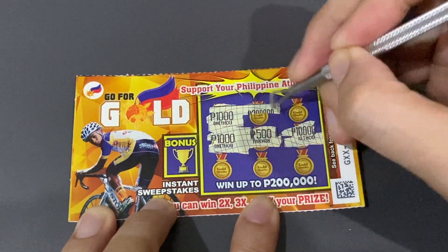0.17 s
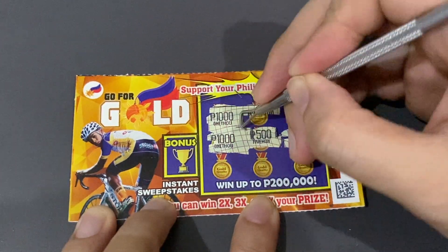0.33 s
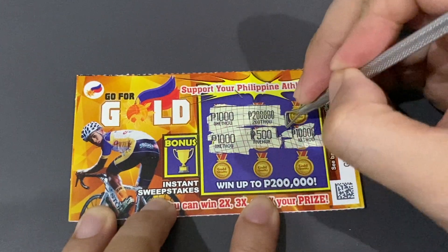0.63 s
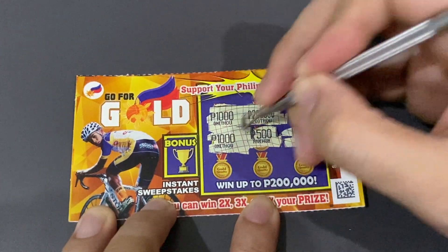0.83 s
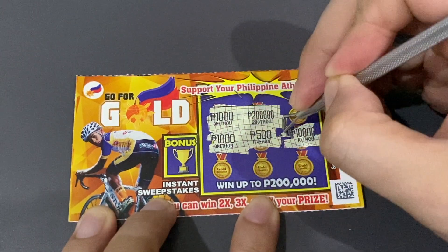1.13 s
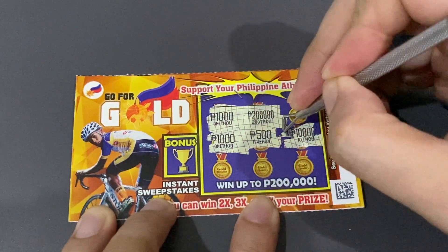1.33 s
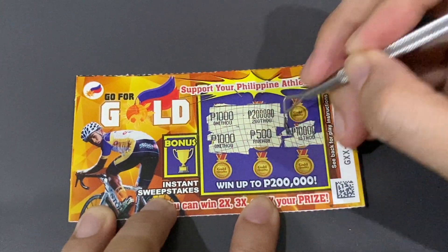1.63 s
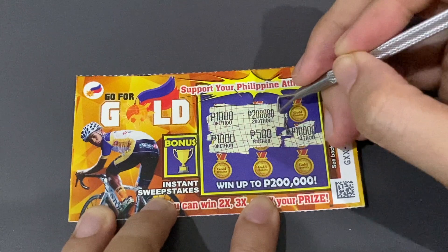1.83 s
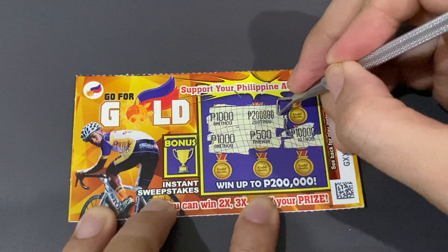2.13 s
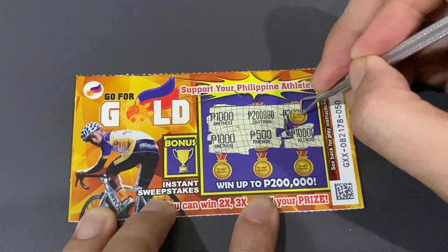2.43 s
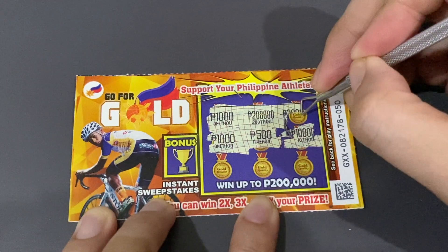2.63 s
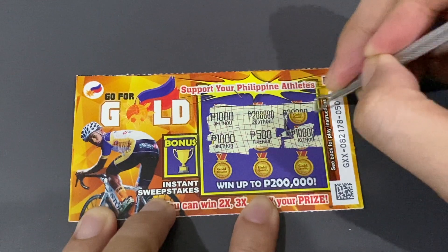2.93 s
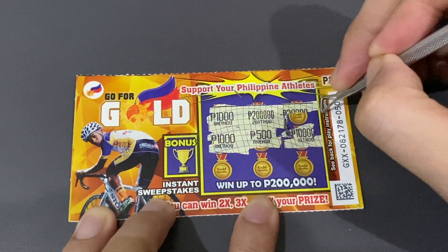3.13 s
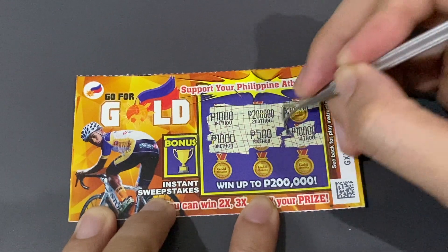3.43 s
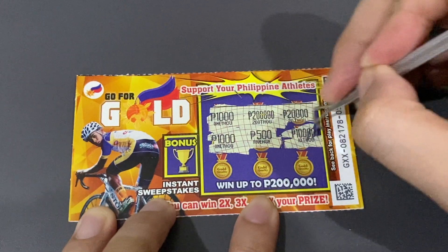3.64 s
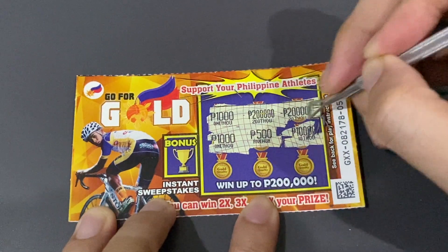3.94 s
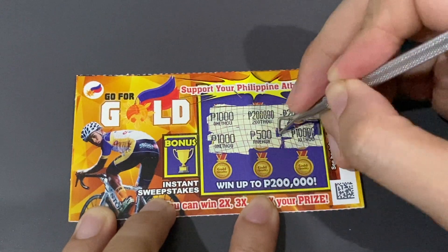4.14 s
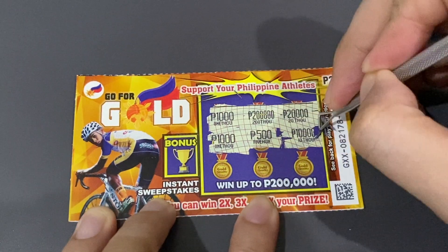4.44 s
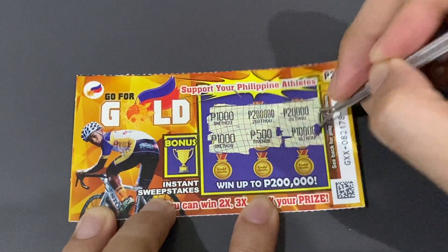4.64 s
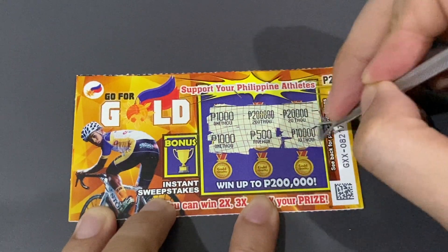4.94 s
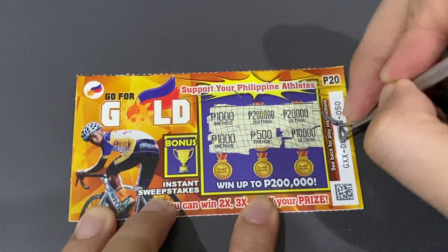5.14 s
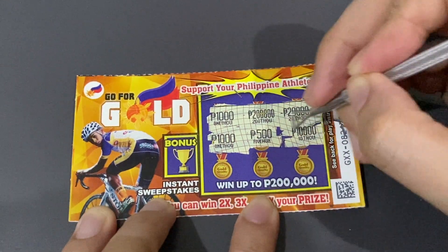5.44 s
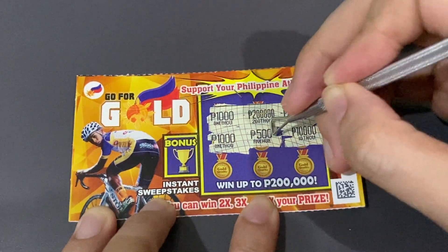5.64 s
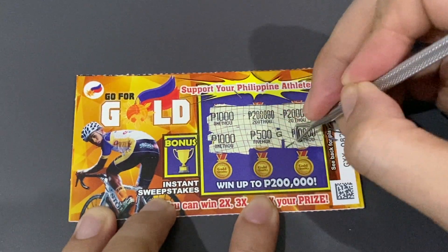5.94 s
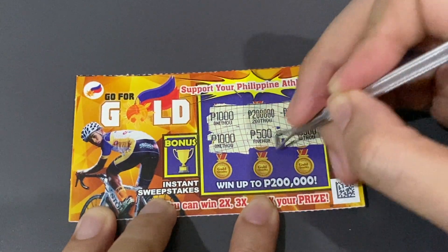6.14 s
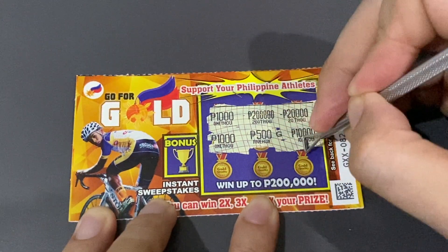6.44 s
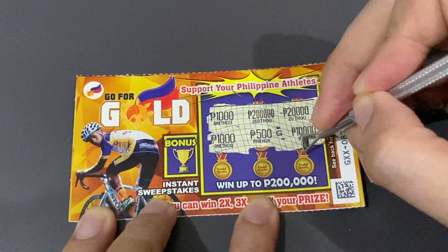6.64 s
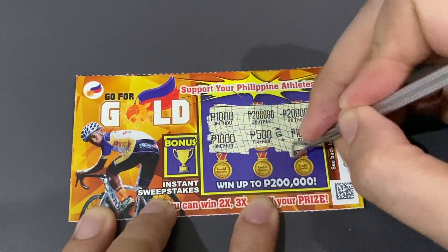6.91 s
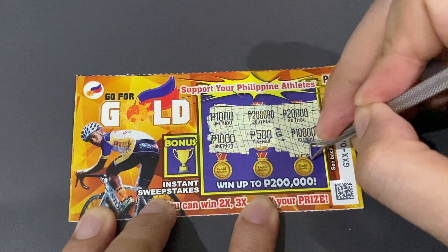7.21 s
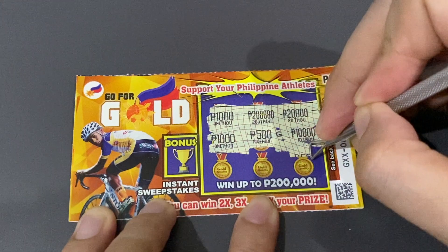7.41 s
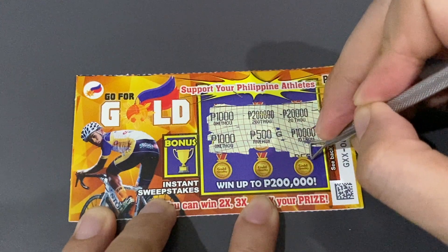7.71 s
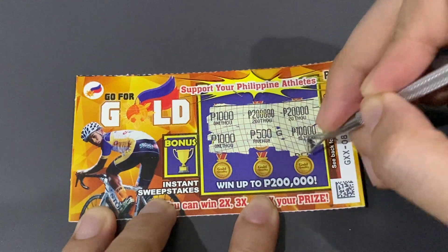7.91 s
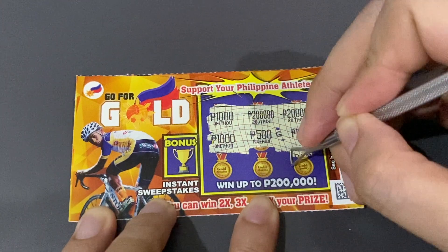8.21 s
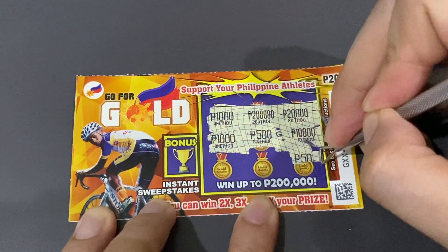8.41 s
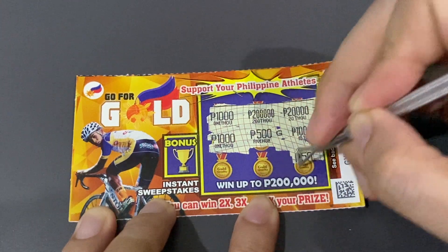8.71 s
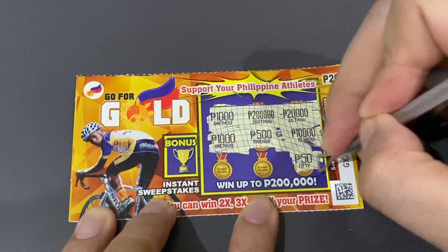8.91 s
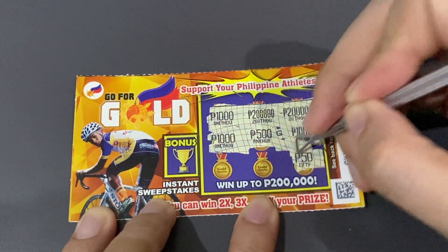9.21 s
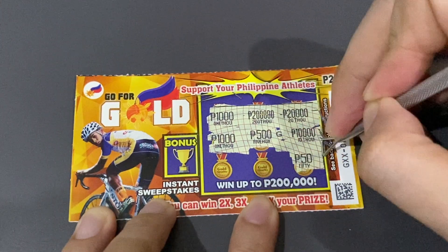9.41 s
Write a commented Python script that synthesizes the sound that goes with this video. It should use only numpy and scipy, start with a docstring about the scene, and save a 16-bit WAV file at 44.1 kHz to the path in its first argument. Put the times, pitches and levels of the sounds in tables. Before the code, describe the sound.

Short, raspy scrapes of a steel tip on a scratch card, mixed with sharp clicks and knocks on a table, in a softly humming room.

```python
"""A low hum fills a small room, and a steel tool starts to scratch the coating off a paper ticket.
Again and again its tip ticks on the card, knocks the table underneath and is dragged in a short rasp.
The knocks make the table top ring. The drags break off tiny crumbs, which hiss and shake the table.
Light touches rustle in between. It is all heard through the two microphone ports of a phone close by."""
import sys
import numpy as np
from scipy import signal
from scipy.fft import rfft, irfft, next_fast_len
from scipy.io import wavfile
from scipy.ndimage import uniform_filter1d, map_coordinates

SR = 44100
rng = np.random.default_rng(int(sys.argv[2]) if len(sys.argv) > 2 else 0)


def wav_record(signal):
    """Record a signal, one row per channel, as 16-bit PCM in the file named by sys.argv[1]."""
    frames = np.transpose(np.atleast_2d(signal))
    bounded = np.clip(frames, -1, 1)
    # unit amplitude maps onto the largest positive 16-bit level
    quanta = np.round(bounded * 32767).astype(np.int16)
    wavfile.write(sys.argv[1], SR, quanta)


N = 421596

# Levels in the tables are relative: the functions add their own gains.
# The steel tip clicks on the card: start_s, level_db, pitch_hz, low_click_db (added to level_db)
TICKS = [(0.074, -34, 9900, -21), (0.0858, -31, 6060, -10), (0.3384, -43, 3000, -3),
         (0.6407, -33.5, 7100, -10.5), (0.873, -36, 9600, -11), (1.2415, -43.5, 3660, 0),
         (1.51, -43.5, 4100, -6), (1.536, -44.5, 5130, -12), (1.8215, -22, 7200, -12.5),
         (2.141, -32.5, 3940, -1.5), (2.817, -51, 3100, 3), (2.8987, -45, 3100, -3),
         (3.206, -37.5, 8900, -10.5), (3.401, -34.5, 4910, 2.5), (3.843, -35, 7800, -8),
         (4.0549, -27, 5300, -2), (4.0756, -32, 11600, -24), (4.7534, -47, 3010, 10.5),
         (4.773, -29.5, 11300, -4), (5.0274, -41, 3060, -10), (5.0485, -45, 3090, -1),
         (5.71, -39.5, 7480, -28), (5.944, -36, 11300, -36), (6.126, -40, 5210, 1),
         (6.14, -24.5, 7040, -19), (6.1938, -35, 7450, -12), (6.5482, -55, 3420, 13),
         (6.7149, -18, 5300, -9.5), (7.7837, -27, 6900, -34), (8.095, -31.5, 5660, -9),
         (8.5538, -41.5, 9600, -8), (8.7058, -36, 3000, 2), (8.7282, -27.5, 8670, -25),
         (9.1746, -31.5, 4930, -6), (9.196, -29, 10200, -25)]
# The tool lands on the table: start_s, level_db, hardness_db, click_db, first_bounce_db
KNOCKS = [(0.262, -19.5, -25, -29.5, -41.5), (0.814, -18.5, -22.5, -27.5, -48),
          (1.835, -28.5, -31.5, -40, -57), (3.415, -19.5, -23, -28.5, -56), (4.071, -24, -30, -47, -38),
          (4.772, -21.5, -21, -37.5, -46), (5.673, -30.5, -29, -43.5, -50), (6.132, -20.5, -18.5, -30, -41),
          (6.726, -20, -11, -49, -36.5), (8.124, -28.5, -18, -40, -48), (8.714, -17.5, -7, -29, -43),
          (9.185, -19, -16.5, -34.5, -38)]


def amp(db):
    """Turn decibels into a gain."""
    return 10 ** (np.asarray(db) / 20)


def unit(x):
    """Scale a sound to an average (rms) level of 1."""
    return x / np.sqrt(np.mean(x ** 2) + 1e-20)


def unit_energy(x):
    """Give a short sound the energy of one millisecond at level 1."""
    return x / np.sqrt(np.sum(x ** 2) / (SR / 1000))


def along(points, hz):
    """Read a curve of (pitch, value) points at hz, on a log scale of pitch."""
    pitches, values = np.transpose(points)
    return np.interp(np.log(hz + 1), np.log(pitches + 1), values)


def filtered(x, response):
    """Change the strength and phase of each frequency f in x by response(f)."""
    n = x.shape[-1]
    padded = 2 * next_fast_len(n // 2 + 4096)
    return irfft(rfft(x, padded) * response(np.fft.rfftfreq(padded, 1 / SR)), padded)[..., :n]


def causal(gain):
    """A filter with this gain that never rings before it is struck (minimum phase)."""
    cepstrum = irfft(np.log(np.maximum(gain, 1e-6)))
    half = len(cepstrum) // 2
    return np.exp(rfft(np.r_[cepstrum[0], 2 * cepstrum[1:half], np.zeros(half)]))


def add(track, start_s, sound):
    """Mix a sound into the track at start_s."""
    part = track[max(round(start_s * SR), 0):][:len(sound)]
    part += sound[:len(part)]


def room_hum(air_db=-45):
    """Narrow bands of noise make a wavering hum over dull room noise."""
    # The bands of the hum: pitch_hz, width_hz, level_db
    hum_bands = [(47, 10.5, -47.5), (112, 20, -57.5), (127.3, 15.4, -46.5), (297, 7.7, -62.5)]
    # The tone of the room noise: pitch_hz, level_db
    air_tone = [(22, -30), (40, 4.5), (80, 2), (150, -0.5), (220, -2.5), (320, -11), (450, -12.5),
                (650, -25.5), (1200, -31.5), (2200, -45.5), (4000, -49.5), (7500, -52), (12000, -56),
                (13500, -82)]
    # How alike left and right are: pitch_hz, likeness (1 = the same)
    likeness = [(40, 0.96), (125, 0.96), (250, 0.61), (500, 0.18), (1000, 0.066), (3000, 0.95),
                (10000, 0.73)]

    def stereo_noise(gain):
        def mid_and_side(f):
            angle = np.arccos(np.clip(along(likeness, f), -1, 1)) / 2
            return gain(f) * np.array([np.cos(angle), np.sin(angle)])
        mid, side = filtered(rng.standard_normal((2, N)), mid_and_side)
        return unit(np.array([mid + side, mid - side]))

    hum = sum(amp(db) * stereo_noise(lambda f: 1 / (1 + ((f - hz) / width) ** 2))
              for hz, width, db in hum_bands)
    return hum + amp(air_db) * stereo_noise(lambda f: amp(along(air_tone, f)))


def tip_contacts(bounces=3, gap_s=0.013, rise_db=0.5, landing_hz=4500, bounce_hz=9550):
    """List every click like a row of TICKS: single ticks, landings and the uneven bounces after them."""
    landing_low_db, bounce_low_db = -2.5, -8
    rows = list(TICKS)
    gaps = gap_s * (.5 + rng.random((len(KNOCKS), bounces)))
    for (start_s, _, _, click_db, bounce_db), flights in zip(KNOCKS, gaps):
        rows.append((start_s, click_db, landing_hz, landing_low_db))
        for k, lag_s in enumerate(np.cumsum(flights)):
            rows.append((start_s + lag_s, bounce_db + k * rise_db, bounce_hz, bounce_low_db))
    return rows


def tip_filter(f, pitch_hz, boost_db=7, octaves=0.4):
    """The bright tone of the steel tip, boosted around the pitch of one contact."""
    # The tone of the tip's click: pitch_hz, level_db
    tip_tone = [(1500, -51), (3000, 0), (4200, -9.5), (5600, 5), (7500, 1.5), (9500, 2), (12000, 0.5),
                (15500, -8), (17000, -31)]
    boost = boost_db * np.exp(-(np.log2((f + 1) / pitch_hz) / octaves) ** 2)
    return causal(amp(along(tip_tone, f) + boost))


def ticks(steel_db=-8, tool_db=-8, snap_s=0.015, ring_s=0.012, ring_db=-15, tool_s=0.025):
    """Steel meets card: a bright snap, a faint ring and a lower click in which the tool itself rings."""
    # The lower click, where the steel tool itself rings: pitch_hz, level_db
    tool_tone = [(500, -25.5), (1400, -5), (1750, -9), (2090, -2.5), (2550, -11), (3000, -9.5), (3500, -16),
                 (4100, -5.5), (5000, -24)]
    track = np.zeros(N)
    t = np.arange(SR // 20) / SR

    def burst(fade, attack_s=0.00027):
        return rng.standard_normal(len(t)) * fade * (1 - np.exp(-t / attack_s))

    steel_fade = amp(-60 * t / snap_s) + amp(ring_db - 60 * t / ring_s)
    tool_fade = amp(-60 * t / tool_s)
    for start_s, db, hz, low_db in tip_contacts():
        steel = unit_energy(filtered(burst(steel_fade), lambda f: tip_filter(f, hz)))
        tool = unit_energy(filtered(burst(tool_fade), lambda f: causal(amp(along(tool_tone, f)))))
        add(track, start_s, amp(db + steel_db) * steel + amp(db + low_db + tool_db) * tool)
    return track


def crumbs(per_second, spread_db):
    """Tiny breaks in the coating: random clicks of uneven size."""
    breaks = rng.random(N) < per_second / SR
    return breaks * rng.choice([-1, 1], N) * amp(spread_db * rng.standard_normal(N))


def brushes(skid_lag_s=0.026, skid_s=0.041, skid_db=-45, skid_hz=7000):
    """A light touch, or the tip skidding on after a tick, loosens a few crumbs in a soft rustle."""
    # The tip or a finger brushes the card: middle_s, length_s, level_db, pitch_hz
    touches = [(3.06, 0.014, -63.5, 10400), (4.617, 0.025, -65.5, 5700), (5.22, 0.025, -71, 6000),
               (5.653, 0.04, -65.5, 5540), (8.598, 0.007, -65, 5600), (9.052, 0.016, -63.5, 9800),
               (9.092, 0.0034, -63, 5750), (9.26, 0.021, -43, 10100)]
    skids = [(start_s + skid_lag_s, skid_s, db + skid_db, skid_hz) for start_s, db, _, _ in TICKS]
    track = np.zeros(N)
    t = np.arange(SR // 4) / SR - 1 / 8  # zero at the middle of the rustle
    loose = crumbs(per_second=2900, spread_db=5.5)
    for middle_s, length_s, db, hz in touches + skids:
        grains = loose[round(middle_s * SR):][:len(t)]
        rustle = unit(filtered(grains, lambda f: tip_filter(f, hz)))
        swell = np.exp(-2 * (t / length_s) ** 2)
        add(track, middle_s + t[0], amp(db) * rustle * swell)
    return track


def table_top(f):
    """The table rings at its own pitches, with deep dips between them."""
    # The ringing pitches of the table under the card: pitch_hz, width_hz, level_db
    modes = [(145, 51, 4.5), (300, 102, 5), (376, 190, -10.5), (437.6, 8.9, 1.5), (534, 10.6, 5),
             (558, 49, 4.5), (702, 52, 4), (868, 35, 4), (1018, 79, 1), (1346, 123, 4.5), (1593, 45, -2.5),
             (1715, 17, -1), (1983, 230, -5), (2497, 140, -5), (2834, 140, -2.5), (3047, 23, -4),
             (3330, 43, -14)]
    return sum(amp(db) * 1j * f * width / (hz * hz - f * f + 1j * f * width) for hz, width, db in modes)


def knocks(gain_db=2, upper_hz=900, usual_hardness_db=-14, edge_db=-3, edge_fade_s=0.045, edge_hz=620):
    """Each landing rings the table; a harder one wakes more of its high pitches."""
    # The force of a landing: pitch_hz, level_db
    blow_tone = [(80, -1.5), (200, -6.5), (300, -1), (600, -0.5), (1000, 1), (1400, -13), (2000, -17),
                 (4000, -27), (8000, -81)]
    travel_s, bend_hz = 0.00279, 400  # bending waves at bend_hz take travel_s; lower ones come later

    def struck_table(f, hardness_db):
        treble_db = (hardness_db - usual_hardness_db) / (1 + (upper_hz / (f + 1)) ** 4)
        force = causal(amp(along(blow_tone, f) + treble_db))
        travel = np.exp(-4j * np.pi * travel_s * np.sqrt(f * bend_hz))
        return force * table_top(f) * travel

    track = np.zeros(N)
    t = np.arange(SR // 4) / SR
    for start_s, db, hardness_db, _, _ in KNOCKS:
        # low waves bounce back from the table's edges, differently for each spot that is hit
        edges = rng.standard_normal(len(t)) * amp(-60 * t / edge_fade_s) * (1 - np.exp(-t / travel_s))
        edges = filtered(edges / np.linalg.norm(edges), lambda f: causal(1 / (1 + (f / edge_hz) ** 4)))
        push = signal.unit_impulse(len(t)) + amp(edge_db) * edges
        ring = filtered(push, lambda f: struck_table(f, hardness_db))
        add(track, start_s, amp(db + gain_db) * unit_energy(ring))
    return track


def drag_gains(end_speed=0.26, lift_s=0.086, thinning_db=3.5):
    """How strong drone, rasp and hiss are as the tip digs in, speeds up, slows down and lifts."""
    # Drags of the tool: start_s, length_s, dig_in_s, rasp_db, fastest_at (share of the length),
    # drone_db, hiss_db (both added to rasp_db)
    strokes = [(0.335, 0.17, 0.0045, -39.5, 0.47, -6, -5.5), (0.864, 0.13, .005, -42, 0.5, -3.5, -1.5),
               (1.195, 0.15, 0.018, -73, 0.35, 0, 3.5), (1.34, 0.36, .03, -78, 0.42, 11, -16),
               (2.135, 0.12, .003, -52, 0.05, 6, -11.5), (2.258, 0.15, .005, -76, .3, 20, -10),
               (2.816, 0.088, 0.0018, -46.5, 1, 4.5, -10.5), (3.482, 0.15, .006, -40.5, 0.26, -3.5, -6.5),
               (4.132, 0.039, 0.013, -51, 0.81, 8, -7.5), (4.169, 0.13, 0.0033, -41.5, 0.48, -4.5, -4.5),
               (4.825, 0.094, 0.029, -48, 0.28, 3.5, -8.5), (4.997, .056, .005, -52.5, 0.39, 5.5, -4.5),
               (5.735, 0.099, .006, -45.5, 0.43, -3.5, -0.5), (6.198, 0.056, .015, -49, 0.53, 2, -9.5),
               (6.267, 0.11, .004, -47.5, 0.099, -0.5, -8), (6.844, 0.15, 0.028, -53, 0.18, 7, -13.5),
               (7.606, 0.11, .03, -83, 0.54, 16.5, -14), (8.217, 0.12, 0.036, -40.5, 0.58, -4.5, -8),
               (8.778, 0.11, .022, -41.5, 0.51, -5, -7), (9.225, .11, 0.022, -44.5, 0.61, -1.5, -7)]
    drone_power, rasp_power, hiss_power = 0.42, 1.47, 1.83  # how steeply each grows with speed
    drone, rasp, hiss = np.zeros((3, N))
    t = np.arange(SR // 2) / SR
    for start_s, length_s, dig_in_s, rasp_db, fastest_at, drone_db, hiss_db in strokes:
        progress = np.interp(t / length_s, [0, np.clip(fastest_at, .05, .95), 1], [0, .5, 1])
        speed = end_speed + (1 - end_speed) * np.sin(np.pi * progress)  # 1 is top speed
        lift_db = -60 * np.maximum(t - length_s, 0) / lift_s
        contact = np.minimum(t / dig_in_s, 1) * amp(rasp_db + lift_db)
        coating = amp(hiss_db - thinning_db * (progress - .5))  # it thins along the drag
        add(drone, start_s, contact * speed ** drone_power * amp(drone_db))
        add(rasp, start_s, contact * speed ** rasp_power)
        add(hiss, start_s, contact * speed ** hiss_power * coating)
    return drone, rasp, hiss


def roaming_tip(x, depth_db=2.16, frame=384):
    """As the tip travels over the card, different pitches swell and fade by turns."""
    spectrum = signal.stft(x, nperseg=frame)[2]
    drift = uniform_filter1d(rng.standard_normal(spectrum.shape), size=4, axis=0)  # smooth over pitch
    drift = uniform_filter1d(drift, size=7, axis=1)  # and over time
    return signal.istft(spectrum * amp(depth_db * unit(drift)), nperseg=frame)[1][:N]


def scrapes(split_hz=1200, drone_db=-1, hiss_db=1, judder_db=2.0, judder_per_s=170):
    """The dragged tip breaks off crumbs, which hiss and shake the table; its grip judders."""
    # The force of the dragged tip: pitch_hz, level_db
    drag_tone = [(100, -12), (300, -13), (550, -10.5), (750, -2.5), (1400, 0), (3000, -0.5), (3600, -7.5),
                 (4500, -9.5), (9000, -64)]
    # The crumbling coating: pitch_hz, level_db
    hiss_tone = [(1500, -23), (3500, -9.5), (3850, 7), (4200, 16.5), (4550, 7.5), (5700, 7.5), (7200, 3.5),
                 (8200, 4.5), (9500, 13), (10600, 5), (12000, 4.5), (14200, 3), (15500, -1), (16500, -33)]
    t = np.arange(N) / SR
    drone_gain, rasp_gain, hiss_gain = drag_gains()
    slips = rng.standard_normal(int(N * judder_per_s / SR) + 4)
    grip = amp(judder_db * map_coordinates(slips, [t * judder_per_s], order=1))
    force = roaming_tip(grip * crumbs(per_second=7000, spread_db=3.5))
    shaken = filtered(force, lambda f: table_top(f) * amp(along(drag_tone, f)))
    # a slow drag mostly drones in the table's low pitches; a fast one rasps in the high ones
    low = filtered(shaken, lambda f: 1 / (1 + (f / split_hz) ** 10))
    drone = amp(drone_db) * drone_gain * unit(low)
    rasp = rasp_gain * unit(shaken - low)
    fizz = filtered(force, lambda f: causal(amp(along(hiss_tone, f))))
    return drone + rasp + amp(hiss_db) * hiss_gain * unit(fizz)


def microphone_ports(x):
    """The direct sound reaches the left and right ports out of step."""
    # How far the left port is ahead: pitch_hz, lead_radians
    left_lead = [(300, 0), (430, -.6), (560, -1.7), (720, 0), (880, 1.6), (1040, -.1), (1300, .5),
                 (2200, 0), (3100, .65), (4300, .3), (5200, .6), (5900, -.5), (6600, -.1), (7800, -.1),
                 (8100, 1.9), (9200, 1.8), (10700, 0), (11500, -.4), (13300, -3.1), (14200, -4),
                 (15300, -6.1)]
    return filtered(x, lambda f: np.exp(.5j * along(left_lead, f) * np.array([[1], [-1]])))


def room_echo(x, delay_s=.006, width=0.34, early_db=5, early_s=0.0074):
    """Near walls answer first, then comes a short tail that dies faster in the treble."""
    # How long the echo takes to fall by 60 dB: pitch_hz, fade_s
    fade_times = [(200, 0.47), (500, 0.53), (1000, 0.32), (3000, 0.27), (7000, 0.23), (14000, 0.13)]
    hz, t, noise = signal.stft(rng.standard_normal((2, SR // 2)), SR, nperseg=256)
    near_walls_db = early_db * np.exp(-(t / early_s) ** 2)
    fade = amp(-60 * t / along(fade_times, hz)[:, None] + near_walls_db)
    mid, side = signal.istft(noise * fade, SR, nperseg=256)[1]
    tail = np.array([mid + width * side, mid - width * side])
    delayed = np.pad(x, ((0, 0), (int(delay_s * SR), 0)))
    return signal.fftconvolve(delayed, tail / np.linalg.norm(tail[0]), axes=1)[:, :N]


def scene(scrape_echo_db=-10, knock_echo_db=-10, tick_echo_db=-13, lean_left_db=1.0):
    """Scrapes, ticks and knocks echo in the room, over the hum."""
    scrape = microphone_ports(scrapes() + brushes())
    tick = microphone_ports(ticks())
    knock = microphone_ports(knocks()) * amp([[lean_left_db], [-lean_left_db]])
    echo = room_echo(amp(scrape_echo_db) * scrape + amp(knock_echo_db) * knock + amp(tick_echo_db) * tick)
    return scrape + knock + tick + echo + room_hum()


def record(dry):
    """The phone cuts off the very highest treble."""
    top_hz = 16500
    return filtered(dry, lambda f: 1 / (1 + (f / top_hz) ** 120))


dry = scene()
out = record(dry)
wav_record(out)
```